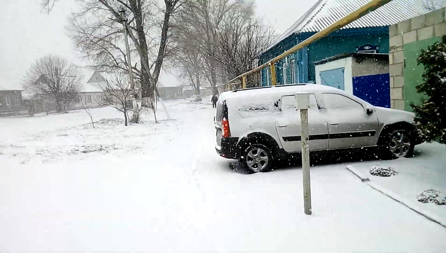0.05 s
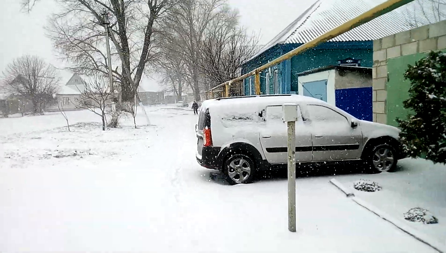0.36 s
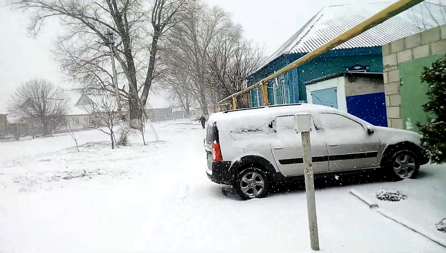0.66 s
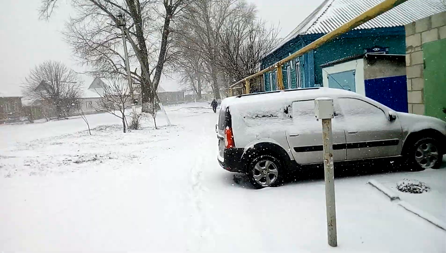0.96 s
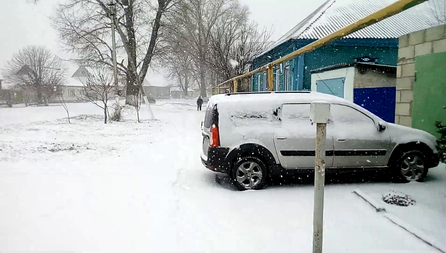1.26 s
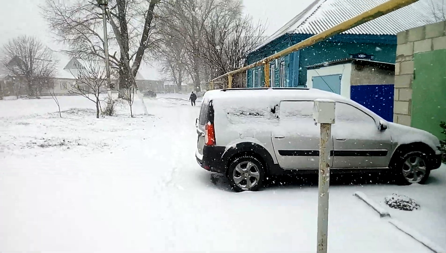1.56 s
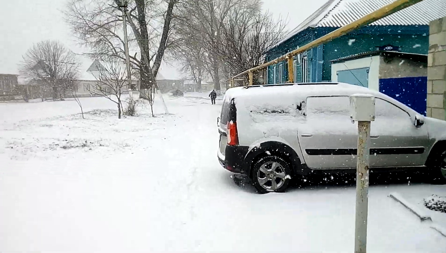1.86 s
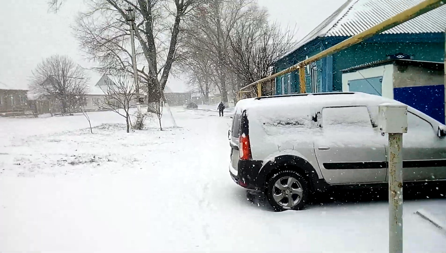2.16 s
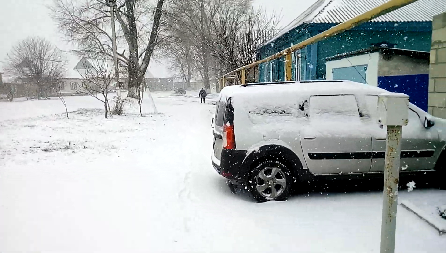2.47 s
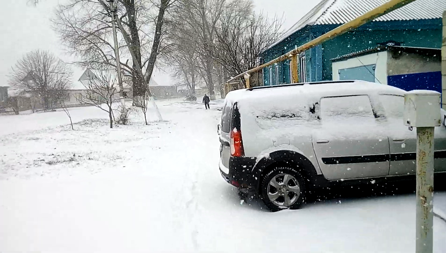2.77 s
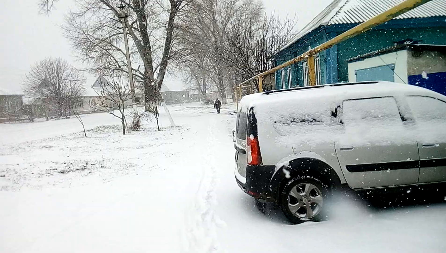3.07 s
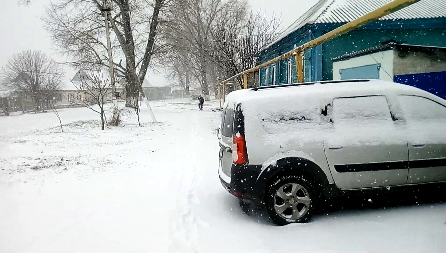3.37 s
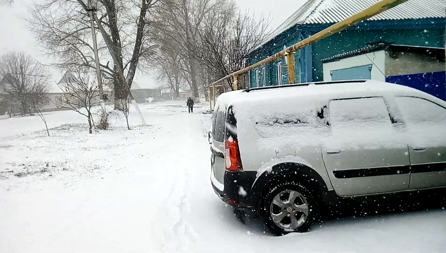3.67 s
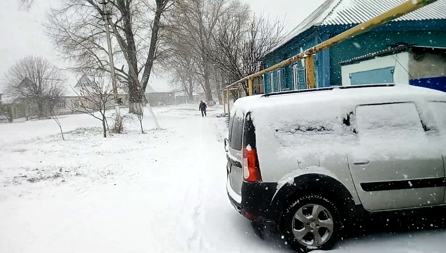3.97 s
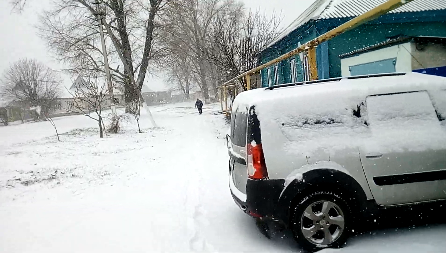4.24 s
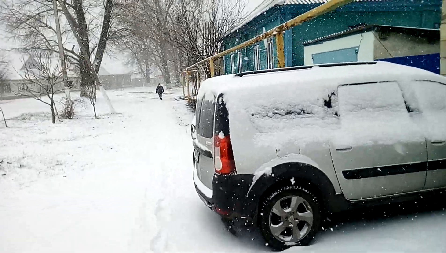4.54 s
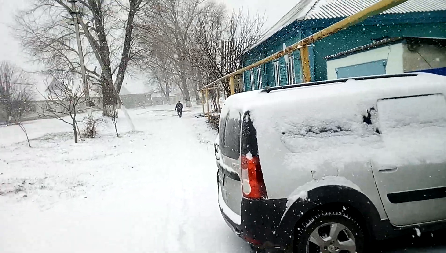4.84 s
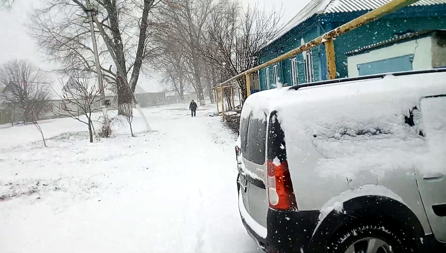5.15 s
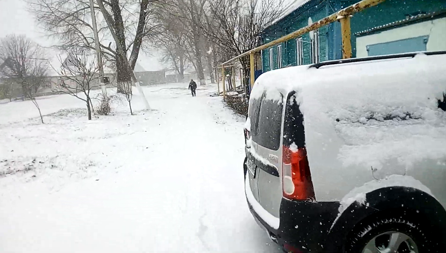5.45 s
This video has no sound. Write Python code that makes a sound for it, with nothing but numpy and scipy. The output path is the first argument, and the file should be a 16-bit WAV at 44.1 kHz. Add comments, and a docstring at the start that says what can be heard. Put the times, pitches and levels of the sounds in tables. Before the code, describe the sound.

Wind hits an unshielded microphone at once, buffeting it with low, fluttering puffs for the first 0.4 seconds. Behind it lies the faint hush of a snowy village street, with no echo. A soft, hoarse, hollow whistle of air swells and sinks throughout, shifting slightly in pitch. From about 0.6 seconds, slow footsteps sound faintly under the wind, roughly two a second, each a dull knock and a small crunch of fresh snow. A second gust strikes at about 2.2 seconds, followed by weaker rumbles. Icy flakes tick right on the microphone, tiny and high, once or twice early on and then in clusters from 2.4 seconds, sharpest around 3.6 to 3.7. A last hard gust arrives near 4.9 seconds with a stronger whistle and another sharp tick, then dies away in small puffs by about 5.6 seconds.

```python
"""A quiet village street in falling snow, the microphone unshielded in the wind.
Gusts buffet it at once in short puffs, and the air soughs over an edge in a hoarse, hollow whistle.
Faint under the wind, someone walks slowly, each boot pressing fresh snow with a knock and a crunch.
Another gust hits after two seconds; then icy flakes tick on the housing, right at the microphone.
A last hard gust comes near five seconds and dies away."""
import sys
import numpy as np
from scipy import signal
from scipy.fft import rfft, irfft, next_fast_len
from scipy.io import wavfile
from scipy.ndimage import uniform_filter1d, map_coordinates

SR = 44100
rng = np.random.default_rng(int(sys.argv[2]) if len(sys.argv) > 2 else 0)


def digitize_waveform(pressure):
    """Quantize a signal to 16-bit integers and store it at the path in sys.argv[1].

    Rows of a 2-D input are taken as channels; values are limited to [-1, 1].
    """
    field = np.atleast_2d(pressure).T
    bounded = np.clip(field, -1, 1)
    quanta = np.round(bounded * 32767).astype(np.int16)
    wavfile.write(sys.argv[1], SR, quanta)


N = 247401


def amp(db):
    """Decibels to gain."""
    return 10 ** (np.asarray(db) / 20)


def unit(x):
    """Scale to rms 1."""
    return x / np.sqrt(np.mean(x ** 2) + 1e-20)


def wobble(rate):
    """A smooth random curve, rate knots a second."""
    knots = rng.standard_normal(int(N * rate / SR) + 4)
    return map_coordinates(knots, [np.arange(N) * rate / SR])


def filtered(x, response):
    """Filter x by a gain given as a function of Hz."""
    size = next_fast_len(len(x) + 8192)
    return irfft(rfft(x, size) * response(np.fft.rfftfreq(size, 1 / SR)), size)[:len(x)]


def shape(points, hz):
    """Gain at hz of (freq_hz, level_db) points joined on a log axis."""
    freq_hz, db = np.transpose(points)
    return amp(np.interp(np.log(hz + 1), np.log(freq_hz), db))


def noise(points):
    """Coloured noise of rms 1."""
    return unit(filtered(rng.standard_normal(N), lambda hz: shape(points, hz)))


def hoarse_tone(mid_hz, half_width_hz):
    """Narrow noise of rms 1 with steep sides."""
    gain = lambda hz: 1 / np.hypot(1, ((hz - mid_hz) / half_width_hz) ** 3)
    return unit(filtered(rng.standard_normal(N), gain))


def steady(x, span_s):
    """Even out swells slower than span_s."""
    power = np.abs(uniform_filter1d(x * x, int(span_s * SR) + 1))
    return x / np.sqrt(power + 1e-6)


def patchy(x, depth_db):
    """Give x random patches of gain in time and frequency, at rms 1."""
    spectrum = signal.stft(x, nperseg=1024)[2]
    patches = uniform_filter1d(rng.standard_normal(spectrum.shape), size=6, axis=0)
    patches = uniform_filter1d(patches, size=8, axis=1)
    return unit(signal.istft(spectrum * amp(depth_db * unit(patches)), nperseg=1024)[1][:N])


def add(track, start_s, sound):
    """Mix a sound into the track at start_s."""
    part = track[max(round(start_s * SR), 0):][:len(sound)]
    part += sound[:len(part)]


def moments(weight, chance):
    """Sample indices, one per chance value (0-1), crowding where the weight is high."""
    total = np.cumsum(weight)
    return np.searchsorted(total, total[-1] * (np.arange(len(chance)) + chance) / len(chance))


def street_hush(street_db=-65, hiss_db=-78, drift_db=-1.0):
    """The hush of the snowy street over the microphone's own hiss."""
    # spectra of the street and of the hiss: freq_hz, level_db
    street = [(20, -2), (45, -26), (90, -13.5), (160, -13), (260, -22.5), (380, -6.5), (590, -5), (900, -7),
              (1500, -8.5), (2000, -15), (2600, -17.5), (5500, -21), (8000, -29.5), (12000, -62)]
    hiss = [(3000, -43), (6000, 2), (8000, -8.5), (9100, -3), (10500, -9.5), (13700, -8), (14600, -6.5),
            (15300, 2), (15650, 2.5), (15900, -47)]
    hush = amp(street_db + drift_db * wobble(7.6)) * patchy(noise(street), depth_db=2.5)
    return hush + amp(hiss_db) * noise(hiss)


def footsteps(thud_t60=0.2, thud_db=-2, knock_db=5, knock_rise_s=0.00045, grains_per_s=750, clump_db=3):
    """A boot lands with a dull knock, then snow crystals break in a swell of clumped grains."""
    # footfalls: start_s, step_db, crunch_db, crunch_s
    steps = [(0.599, -57.5, -65.5, 0.046), (1.157, -57.5, -78, 0.087), (1.31, -75, -63.5, 0.042),
             (1.686, -52, -69, 0.047), (2.195, -64, -69, 0.059), (2.78, -60, -67.5, 0.054),
             (3.2, -59, -72.5, 0.13), (3.683, -71, -64, 0.05), (4.211, -56.5, -59.5, 0.025),
             (4.705, -51, -69, 0.077), (5.358, -70, -56.5, 0.018)]
    # modes of a boot sole on packed snow: pitch_hz, level_db, t60_s
    sole_modes = [(244, -3, 0.047), (437, -1, 0.023), (900, -3, 0.02), (1285, -2, 0.017), (1630, 3, 0.0097)]
    # spectra of the thud and of the breaking snow: freq_hz, level_db
    thud_spectrum = [(60, -4), (200, -27), (420, -8.5), (850, -7), (1300, -18), (2000, -27), (4000, -42),
                     (9000, -68)]
    crunch_spectrum = [(200, -25), (900, 3.5), (1700, 7.5), (2700, -1), (4000, -3.5), (5200, 7.5),
                       (7000, -2), (9000, -8), (13000, -11), (16000, -54)]
    knocks, weight, press = np.zeros((3, N))
    t = np.arange(SR // 2) / SR
    for start_s, step_db, crunch_db, crunch_s in steps:
        sole = np.zeros(len(t))
        for hz, db, t60 in sole_modes:
            cycles = hz * rng.normal(1, 0.024) * t + rng.random()
            sole += amp(db - 60 * t / t60) * np.sin(2 * np.pi * cycles)
        add(knocks, start_s, amp(step_db + knock_db) * sole * (1 - np.exp(-t / knock_rise_s)))
        add(weight, start_s, amp(step_db + thud_db - 60 * t / thud_t60))
        age = 2 * t / crunch_s
        add(press, start_s, amp(crunch_db) * age * np.exp(1 - age))
    breaks = rng.random(N) < grains_per_s / SR
    grains = breaks * rng.lognormal(0, 0.45, N) * rng.choice([-1, 1], N)
    clumps = grains * amp(clump_db * wobble(120))
    crunch = unit(filtered(clumps, lambda hz: shape(crunch_spectrum, hz)))
    return knocks + weight * steady(noise(thud_spectrum), span_s=0.038) + press * crunch


def air_push(start_s, hold_s, attack_s, release_s, sag_db_per_s, wake_db, wake_s):
    """Gain of a push of air: rise up to start_s, sagging hold, release into a wake (slopes per 20 dB)."""
    t = np.arange(N) / SR - start_s
    before, after = np.maximum(-t, 0), np.maximum(t - hold_s, 0)
    fall_db = np.maximum(-20 * after / release_s, wake_db - 20 * after / wake_s)
    return amp(-20 * before / attack_s - sag_db_per_s * np.clip(t, 0, hold_s) + fall_db)


def whistle_flow(wind_db, gust_leak_db=-35, rest_hz=1640, climb_hz_per_s=130):
    """The whistle's level in dB and centre in Hz: gusts stir it, the strongest swell leads the pitch."""
    # swells of the whistle: start_s, hold_s, level_db, attack_s, centre_hz
    swells = [(0.124, .03, -61, .06, 1520), (0.415, 0.055, -58, 0.18, 1570),
              (0.601, .006, -56.5, 0.015, 1610), (0.718, .02, -64.5, 0.047, 1600),
              (0.974, 0.021, -62, 0.054, 1665), (1.291, 0.075, -59.5, .26, 1844),
              (2.477, 0.073, -55, 0.1, 1692), (2.68, 0.17, -56, .13, 1830), (3.303, .012, -64, .04, 1650),
              (3.581, 0.25, -55.5, 0.12, 1868), (4.013, 0.072, -64.5, 0.56, 2020),
              (4.752, 0.0063, -48.5, 0.026, 1696), (4.839, 0.16, -52.5, 0.12, 1810),
              (5.247, 0.023, -59, 0.22, 1750), (5.35, 0.028, -56, 0.058, 1706),
              (5.473, 0.035, -64.5, 0.2, 1670)]
    t = np.arange(N) / SR
    power = amp(wind_db + gust_leak_db) ** 2
    weighted_hz = power * rest_hz
    for start_s, hold_s, db, attack_s, hz in swells:
        push = air_push(start_s, hold_s, attack_s, release_s=0.087,
                        sag_db_per_s=13.5, wake_db=-7.5, wake_s=0.46)
        share = (amp(db) * push) ** 2
        power += share
        weighted_hz += share * (hz + climb_hz_per_s * np.clip(t - start_s, 0, hold_s))
    return 10 * np.log10(power), weighted_hz / power


def whistle(level_db, centre_hz, reach_hz=115, air_db=-12, waver_db=2.5):
    """Air whistles hoarsely over an edge; each swell has its own pitch, climbing slightly as it holds."""
    # resonances of the whistling air and their overtones: pitch_hz, half_width_hz, level_db
    resonances = [(1635, 58, 10.5), (1798, 237, 11), (1995, 234, 13)]
    overtones = [(3490, 175, -22), (5480, 500, -22)]
    # spectrum of the rushing air: freq_hz, level_db
    air = [(600, -3), (1200, 8.5), (2400, -3), (2800, 1.5), (4300, -14.5), (5400, -25.5), (6600, -3.5),
           (8000, -15), (9200, -11.5), (12000, -36), (15300, -9), (16000, -72)]
    tone = sum(amp(db) * hoarse_tone(hz, width) / (1 + ((centre_hz - hz) / reach_hz) ** 2)
               for hz, width, db in resonances)
    hollow = sum(amp(db) * hoarse_tone(hz, width) for hz, width, db in overtones)
    hiss = amp(air_db) * patchy(noise(air), depth_db=1.5)
    return amp(level_db + waver_db * wobble(45)) * (steady(tone, span_s=0.02) + hollow + hiss)


def flakes(wind_db, gain_db=10, tick_t60=0.0041, rebound_s=0.0021, ring_db=-33, ring_t60=0.13,
           width_octaves=0.33, faint_rebound_db=-6, crowding=0.45, faint_count=20):
    """Each icy flake ticks on the housing and again as it rebounds; faint ones crowd into the gusts."""
    # the loudest flakes: start_s, level_db, pitch_hz, rebound_db
    hits = [(0.2388, -48, 6200, -31), (1.296, -40, 10800, -13), (2.394, -51, 6150, -16),
            (2.4072, -45, 7160, -24), (2.4189, -40.5, 7800, -28), (2.8613, -31.5, 7900, 11),
            (2.9469, -37, 7100, -3), (2.9566, -42.5, 7100, -3), (3.012, -45, 7300, -13),
            (3.5349, -45, 8550, 0), (3.6188, -24.5, 7650, -11), (3.6742, -19.5, 8130, -7),
            (3.6917, -37, 6440, -8), (3.9462, -45, 8600, -1), (4.2113, -44, 8100, 0),
            (4.2176, -34.5, 7960, -3), (4.817, -43.5, 6500, -13), (4.8582, -39.5, 8500, -9),
            (4.871, -22, 9950, -33), (5.0285, -48.5, 8540, 1), (5.466, -49.5, 9300, 5)]
    # response of the housing: freq_hz, level_db
    housing = [(1500, -48), (3500, -1.5), (5000, 1.5), (6000, -2), (7000, 1), (8000, -5.5), (9300, -1.5),
               (11000, -8.5), (13500, -15), (15300, 10), (16500, -5)]
    out, t = np.zeros(N), np.arange(SR // 20) / SR
    chance, size, spot = rng.random((faint_count, 3)).T
    faint_s = moments(amp(crowding * wind_db), chance) / SR
    faint_db = -57 + 8 * (size - 0.5)
    faint_hz = 6500 + 3500 * spot
    faint_hits = zip(faint_s, faint_db, faint_hz, np.full(faint_count, faint_rebound_db))
    for start_s, db, pitch_hz, rebound_db in [*hits, *faint_hits]:
        after = t - rebound_s * rng.lognormal(0, 0.043)
        rebound = (after > 0) * amp(rebound_db - 60 * np.abs(after) / tick_t60)
        decay = amp(-60 * t / tick_t60) + rebound + amp(ring_db - 60 * t / ring_t60)
        burst = np.pad(decay * rng.choice([-1, 1], len(t)), (SR // 1000, 0))  # 1 ms lead for the filter
        # each spot of the housing rings around its own pitch
        colour = lambda hz: shape(housing, hz) / (1 + (np.log2((hz + 1) / pitch_hz) / width_octaves) ** 2)
        tick = filtered(burst, colour)
        add(out, start_s - 0.001, amp(db + gain_db) * tick / np.linalg.norm(tick))
    return out


def wind_strength(calm_db=-68.5, stir_db=3):
    """Level in dB of the wind at the microphone port: gusts over a faintly stirring calm."""
    # gusts that hit the port: start_s, hold_s, level_db
    gusts = [(0.0, .325, -40), (0.07, .085, -37), (0.388, .035, -54), (1.005, .015, -52), (1.232, .11, -62),
             (1.556, .03, -61.5), (2.164, .115, -40), (2.379, .02, -43.5), (2.547, .015, -56.5),
             (2.782, .02, -53), (2.945, .115, -50.5), (3.269, .13, -53), (3.469, .05, -44),
             (3.625, .025, -47), (3.721, .04, -50), (3.867, .055, -63.5), (4.373, .008, -58),
             (4.841, .275, -47), (4.912, .04, -37), (5.295, .015, -51.5), (5.417, .09, -50)]
    power = amp(calm_db + stir_db * wobble(14)) ** 2
    for start_s, hold_s, db in gusts:
        push = air_push(start_s, hold_s, attack_s=0.035, release_s=0.06,
                        sag_db_per_s=6, wake_db=-16, wake_s=0.22)
        power += (amp(db) * push) ** 2
    return 10 * np.log10(power)


def buffeting(wind_db, gain_db=-1.5, knee_db=-42, flutter_db=-6, rumble_db=-2, lump_db=3, ceiling_db=-35):
    """Turbulence at the port: harder wind sheds smaller, higher eddies."""
    # spectra of the large and of the small eddies: freq_hz, level_db
    rumble = [(20, -21), (45, -12.5), (85, 5), (150, 4), (250, -2.5), (400, -19.5), (650, -34), (1200, -50),
              (3000, -100)]
    flutter = [(40, -21), (150, 1), (300, 8.5), (550, -2.5), (800, -18), (1200, -18), (2500, -45),
               (6000, -100)]
    lumps = amp(lump_db * wobble(70))
    brightness = amp(flutter_db + wind_db - knee_db)
    flow = steady(amp(rumble_db) * noise(rumble) + brightness * noise(flutter), span_s=0.027)
    # in the hardest gusts the churning levels off
    strength = 1 / np.hypot(amp(-wind_db), amp(-ceiling_db))
    return amp(gain_db) * strength * lumps * flow


def small_eddies(wind_db, over_db=4, onset_db=-56, mid_hz=130, spread=0.26, octave_db=-16, count=30):
    """Lesser eddies that gusts shed at random: start_s, level_db, pitch_hz, octave_db."""
    chance, size = rng.random((count, 2)).T
    shedding = 1 / (1 + amp(onset_db - wind_db) ** 2)
    at = moments(shedding, chance)
    pitch_hz = mid_hz * np.exp(spread * (2 * size - 1))
    return list(zip(at / SR, wind_db[at] + over_db, pitch_hz, np.full(count, octave_db)))


def puffs(wind_db, gain_db=-1, rise_cycles=0.97, slowing=0.16, start_ratio=1.223, port_hz=1000):
    """An eddy swings the pressure at the port for about two cycles and slows as it passes."""
    # the strongest eddies: start_s, level_db, pitch_hz, octave_db
    strong_eddies = [(0.079, -23, 338, -15.5), (0.088, -26.5, 262, -11), (0.099, -22.5, 453, -28),
                     (0.109, -17.5, 515, -39.5), (0.134, -18, 476, -12), (0.141, -22.5, 350, -8),
                     (0.238, -29.5, 240, -7.5), (0.288, -26.5, 211, -14), (0.314, -37, 201, -29),
                     (1.151, -44.5, 228, -3), (2.141, -25.5, 246, -35), (2.17, -31.5, 125, -6),
                     (2.2109, -19, 194, -15.5), (2.266, -28.5, 232, -20), (3.039, -38, 206, -28),
                     (3.49, -41.5, 175, 0), (3.629, -42, 135, -13), (3.726, -43, 129, -10),
                     (4.873, -16, 400, -7), (4.912, -25, 368, -1.5), (4.916, -21.5, 249, -8.5),
                     (5.107, -40.5, 130, -11), (5.455, -35, 114, -34)]
    out, t = np.zeros(N), np.arange(SR // 16) / SR
    for start_s, db, hz, octave_db in strong_eddies + small_eddies(wind_db):
        age = t * hz / rise_cycles
        swell = (age * np.exp(1 - age)) ** 3
        cycles = start_ratio * np.log1p(slowing * t * hz) / slowing
        phase = 2 * np.pi * (cycles + rng.random())
        # the swing steepens at its height, which adds the octave
        octave = amp(octave_db) * swell * np.sin(2 * phase)
        add(out, start_s, amp(db + gain_db) * swell * (np.sin(phase) + octave))
    # the port rounds off the steepest swings
    return filtered(out, lambda hz: 1 / np.hypot(1, (hz / port_hz) ** 6))


def scene():
    """Wind, flakes and steps at one microphone in open air, without echo."""
    wind_db = wind_strength()
    wind = buffeting(wind_db) + puffs(wind_db) + whistle(*whistle_flow(wind_db))
    return (wind + flakes(wind_db) + footsteps() + street_hush())[None]


def record(dry):
    """The recorder keeps nothing above its band limit."""
    top_hz = 16600
    return np.array([filtered(channel, lambda hz: hz < top_hz) for channel in dry])


dry = scene()
out = record(dry)
digitize_waveform(out)
```